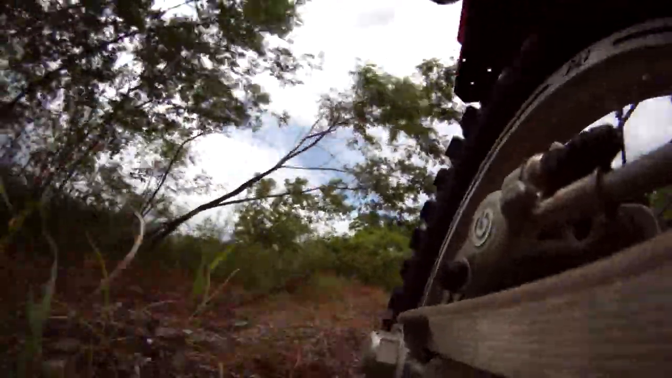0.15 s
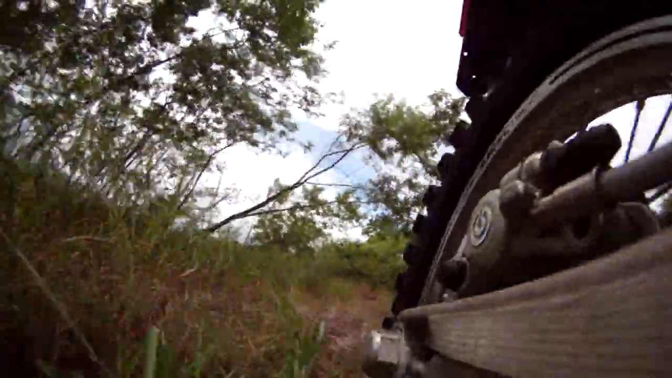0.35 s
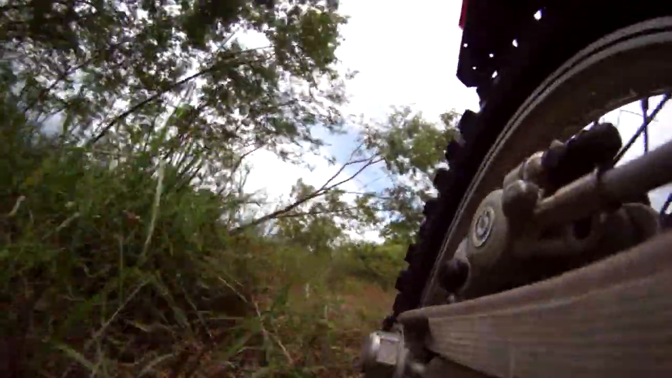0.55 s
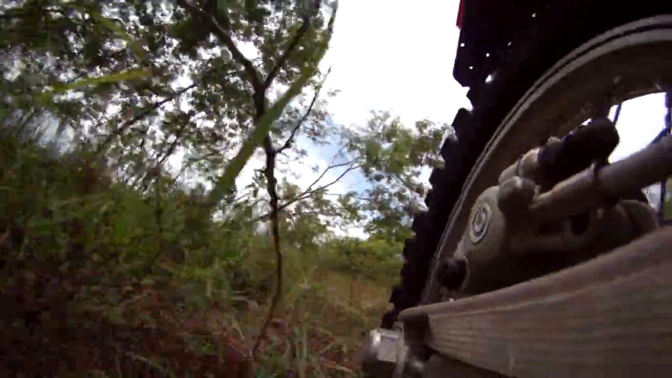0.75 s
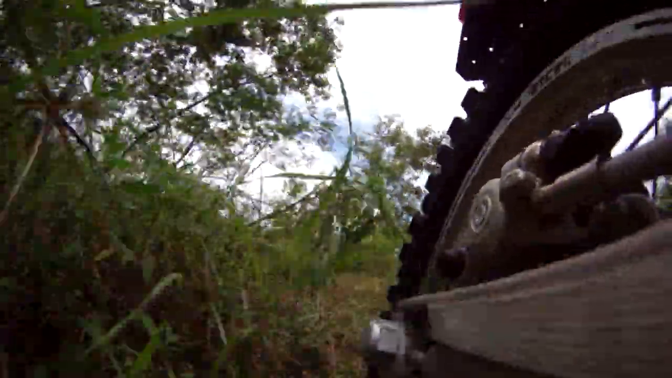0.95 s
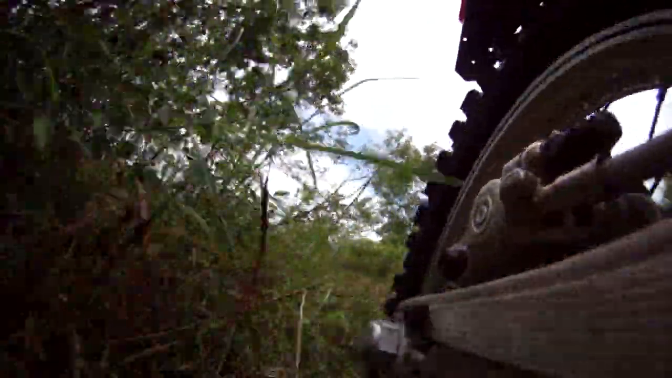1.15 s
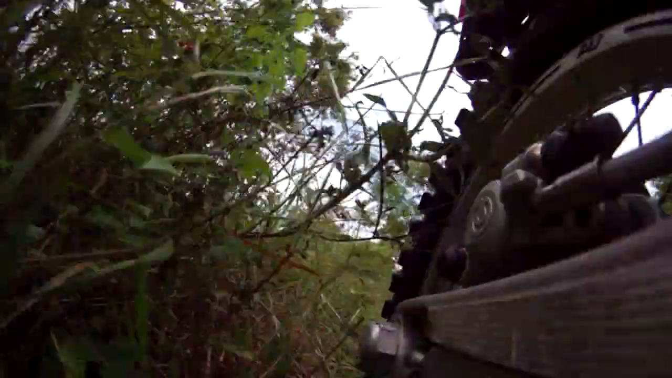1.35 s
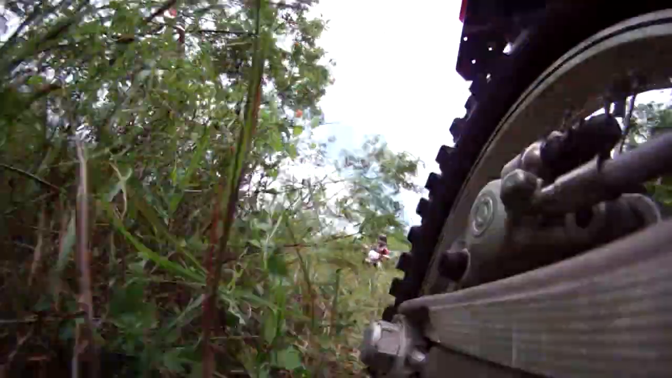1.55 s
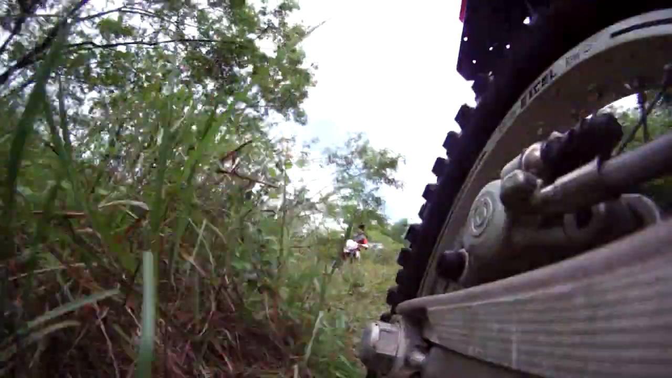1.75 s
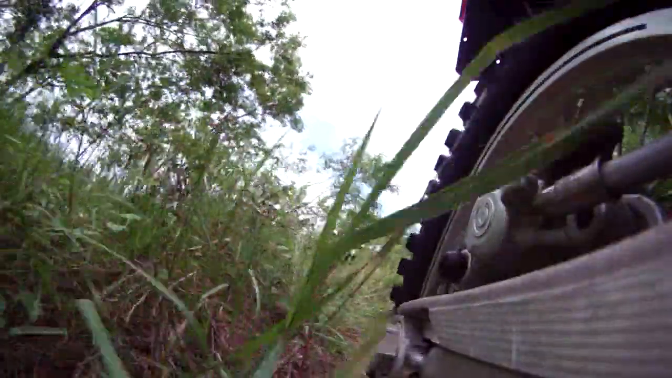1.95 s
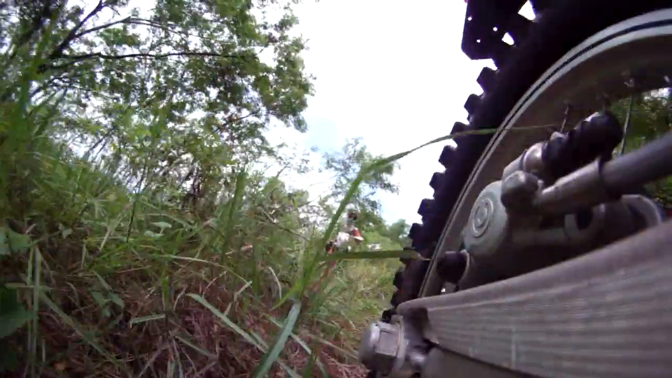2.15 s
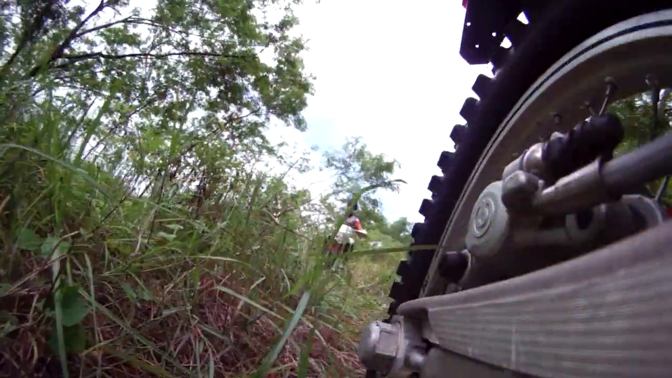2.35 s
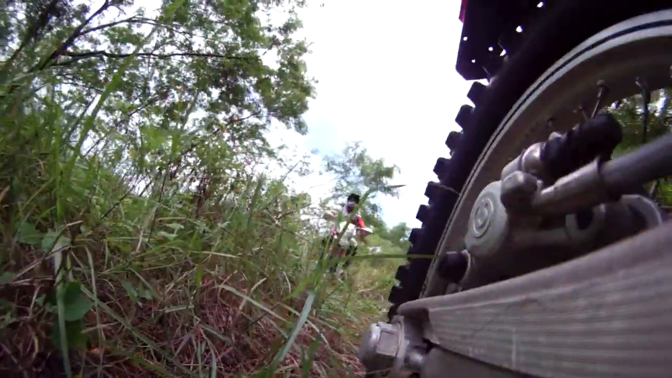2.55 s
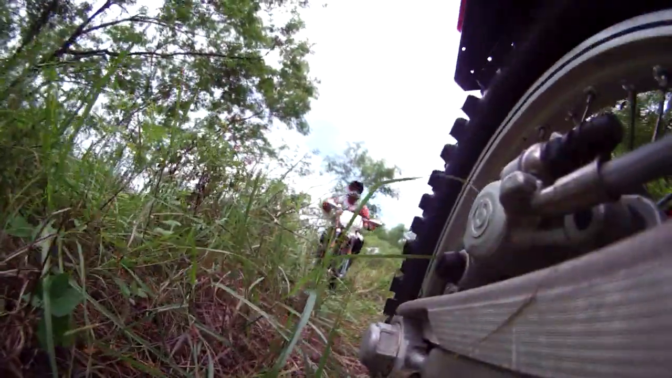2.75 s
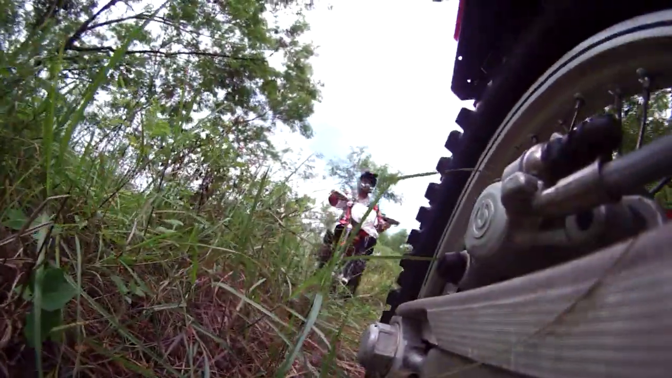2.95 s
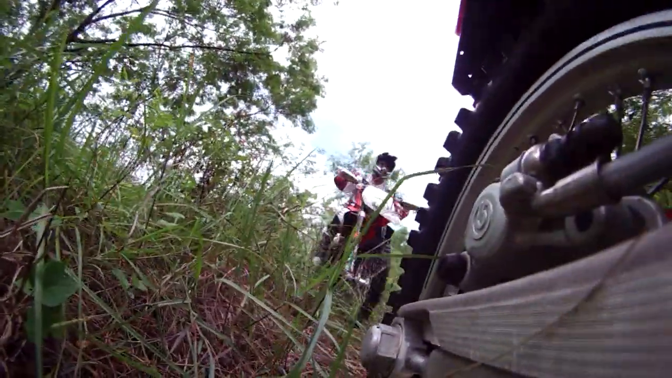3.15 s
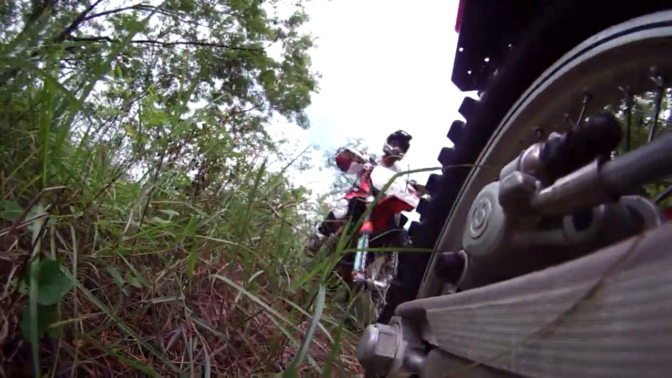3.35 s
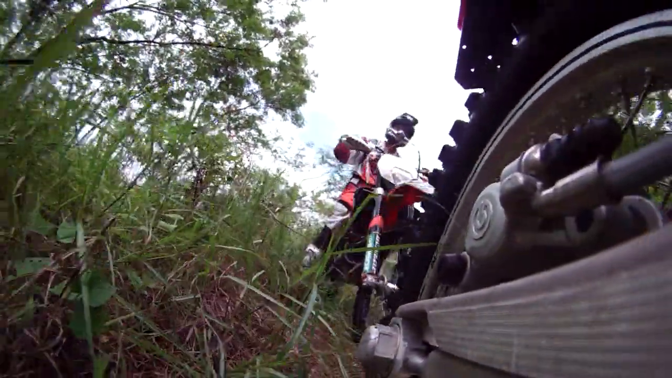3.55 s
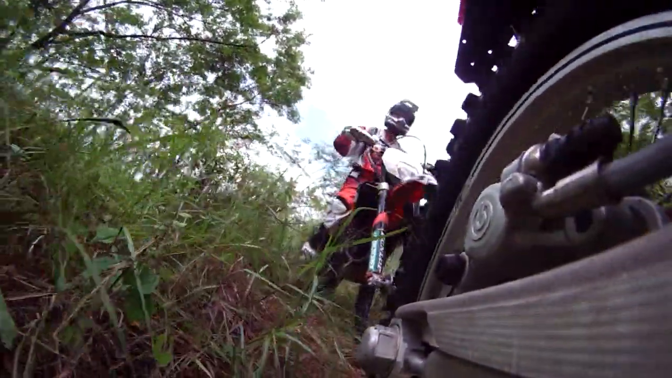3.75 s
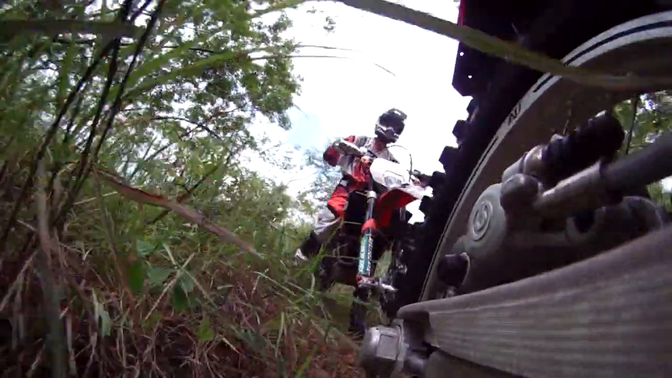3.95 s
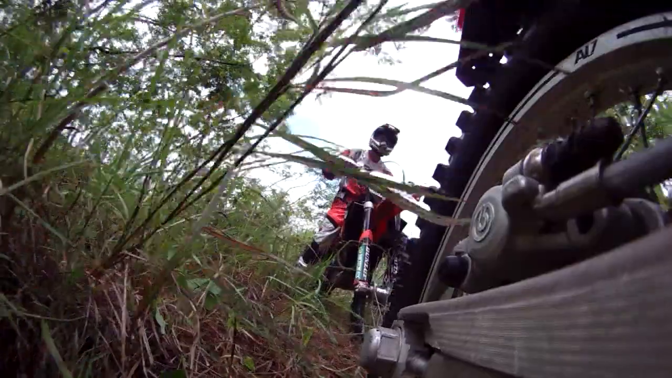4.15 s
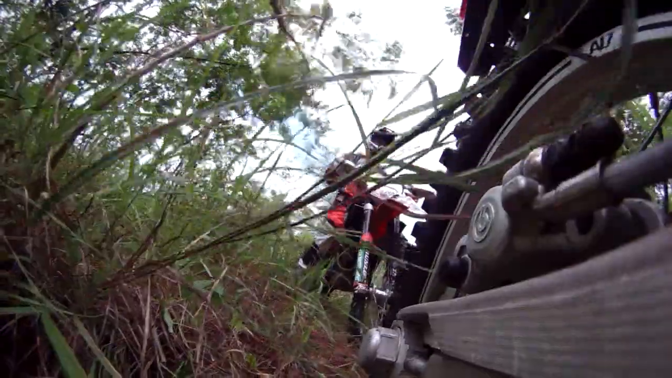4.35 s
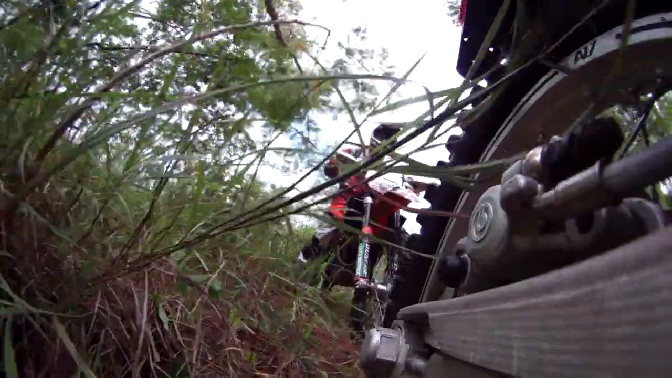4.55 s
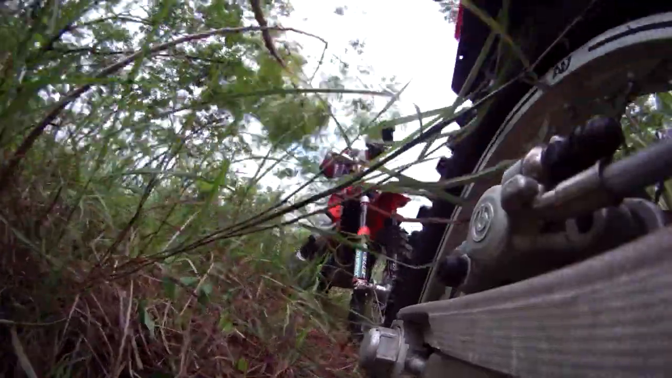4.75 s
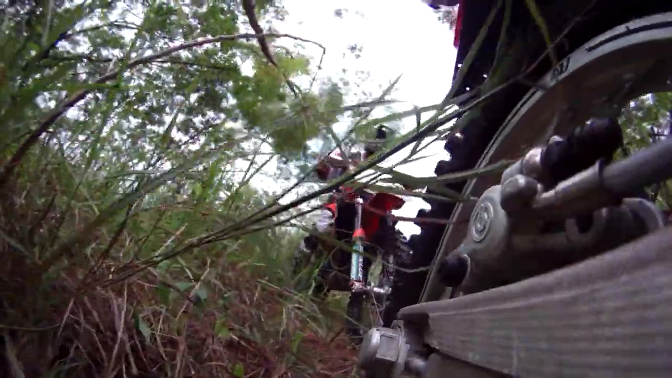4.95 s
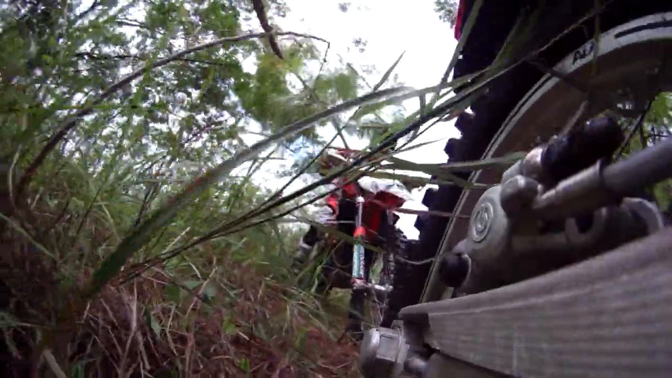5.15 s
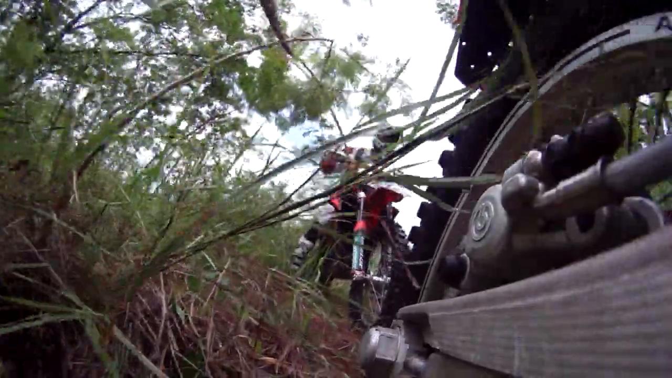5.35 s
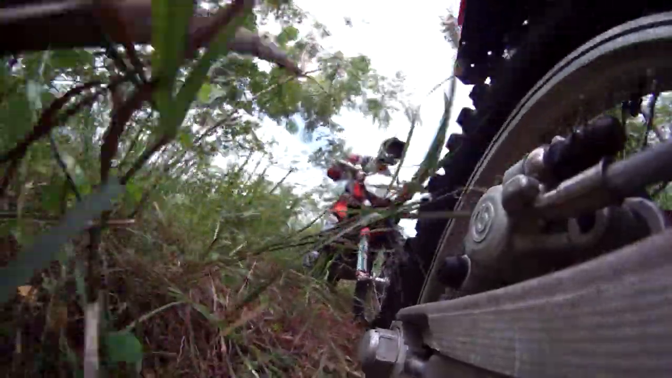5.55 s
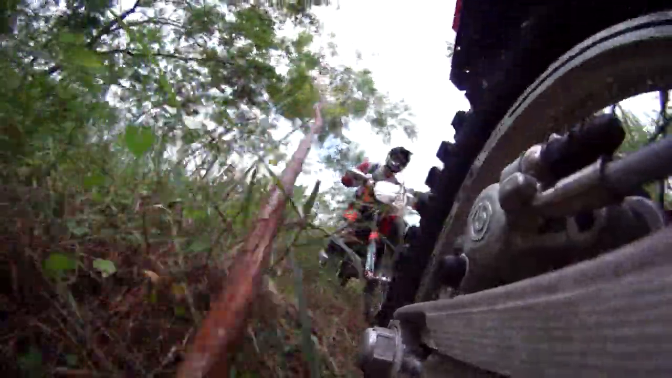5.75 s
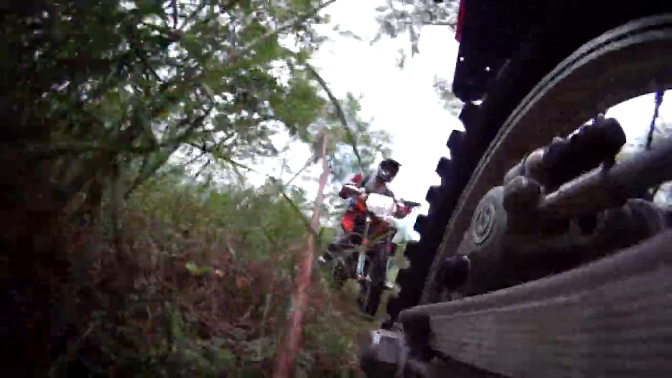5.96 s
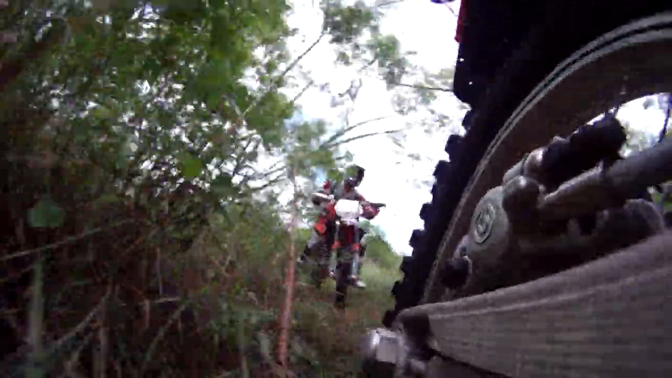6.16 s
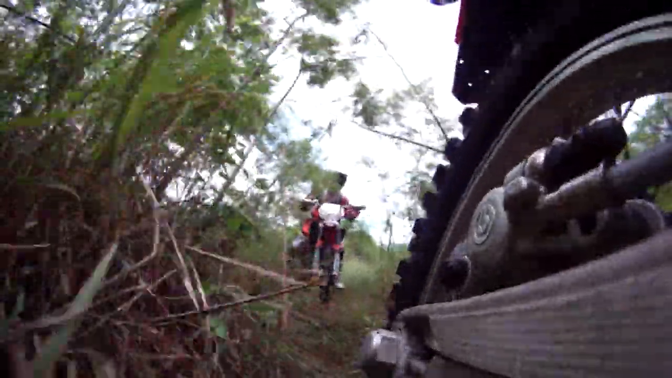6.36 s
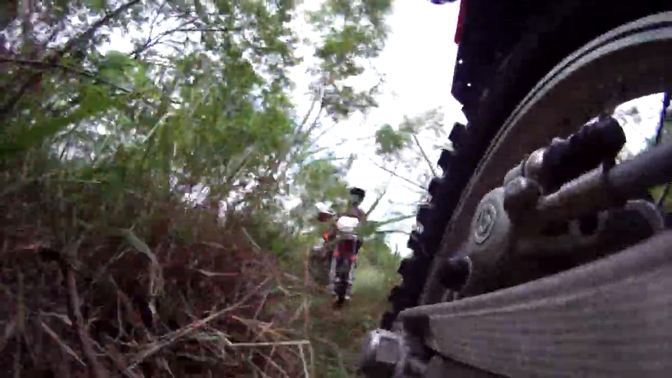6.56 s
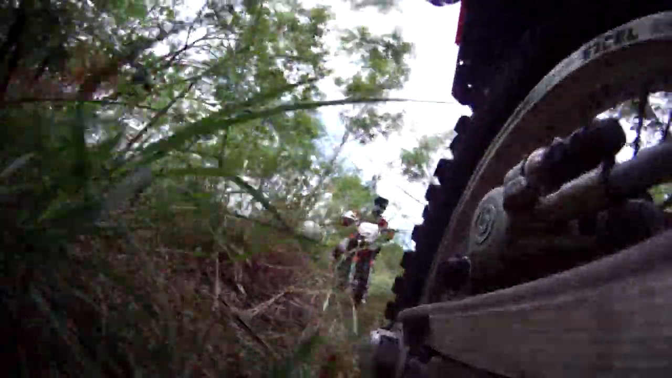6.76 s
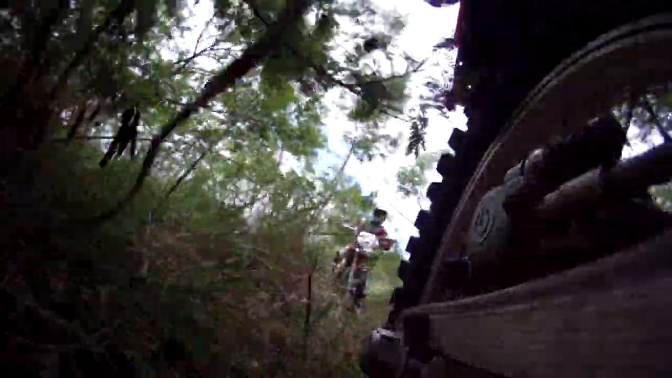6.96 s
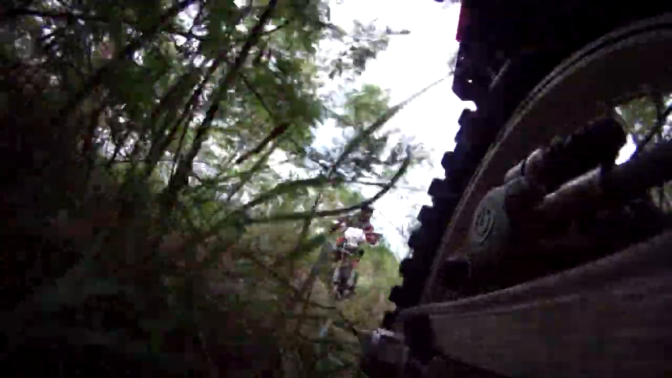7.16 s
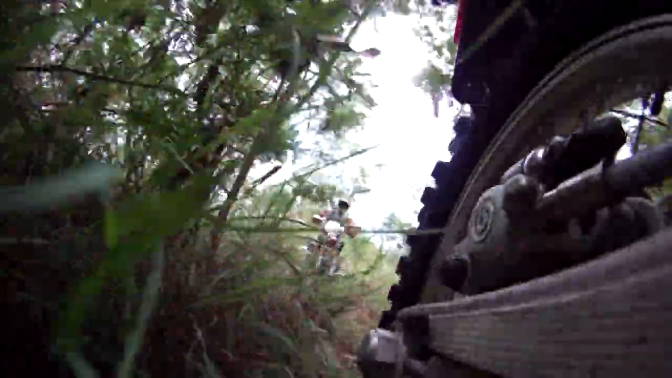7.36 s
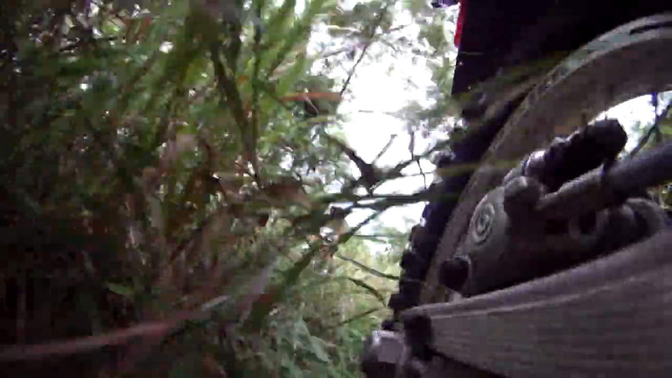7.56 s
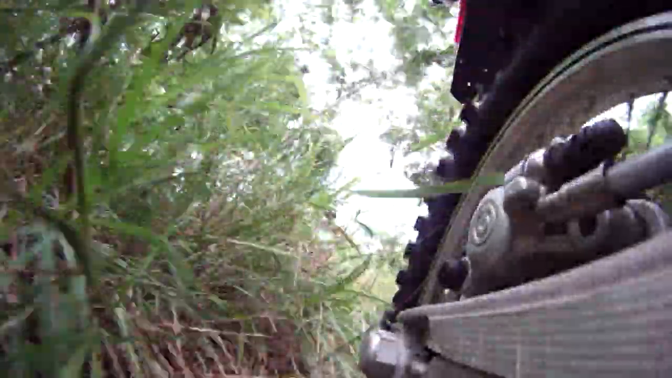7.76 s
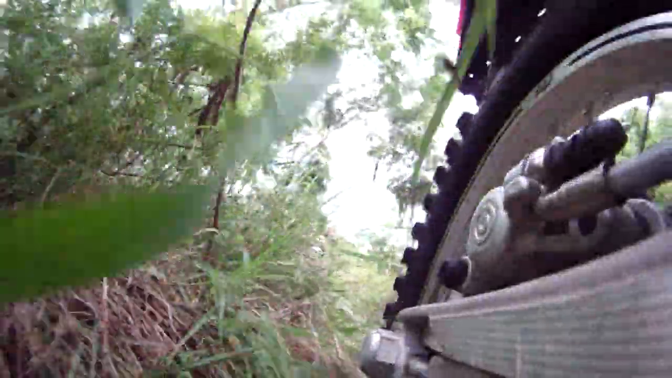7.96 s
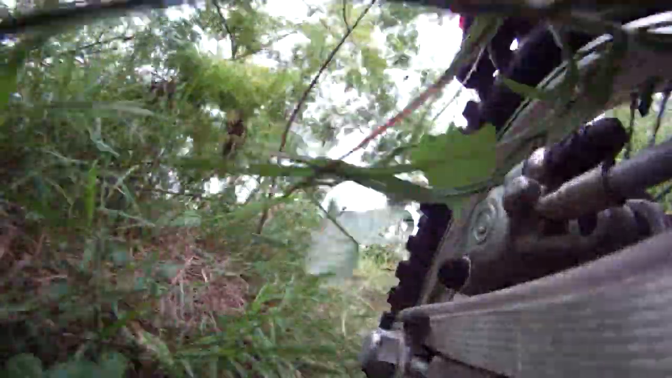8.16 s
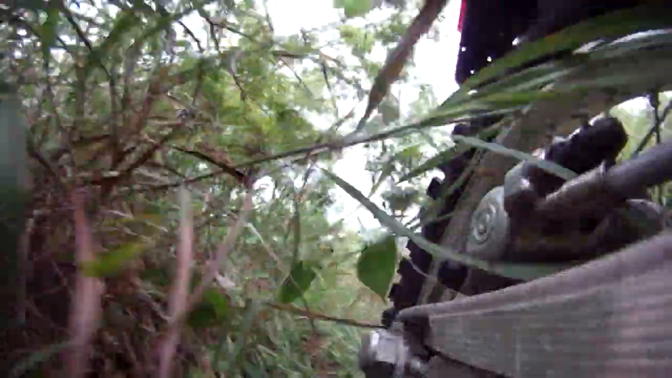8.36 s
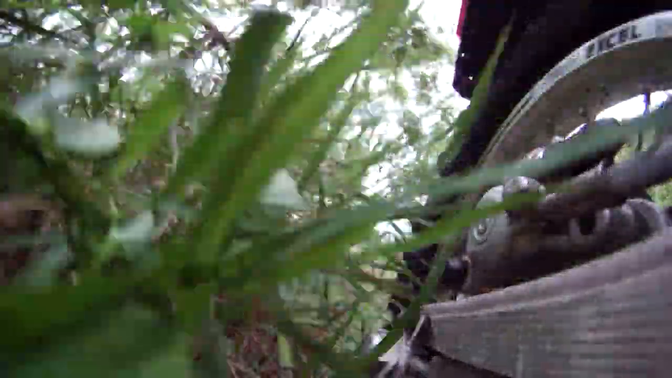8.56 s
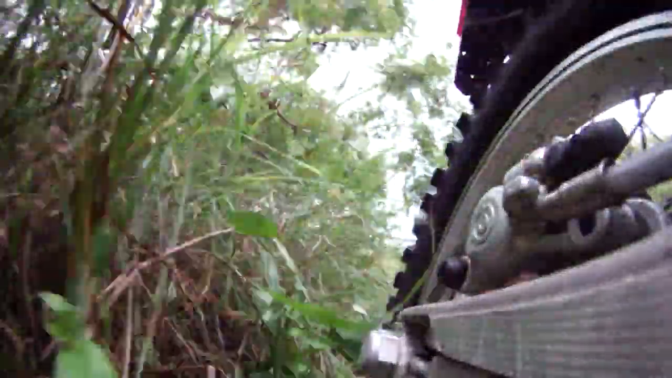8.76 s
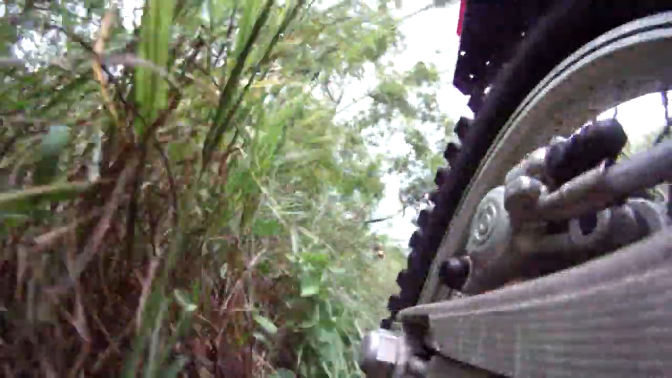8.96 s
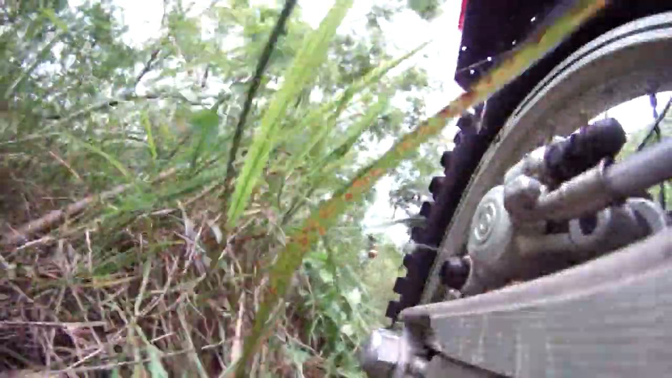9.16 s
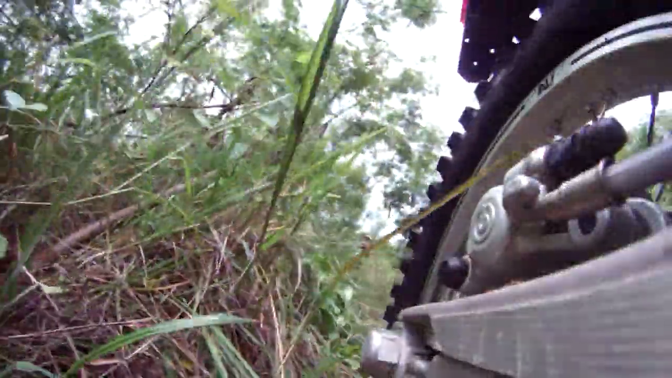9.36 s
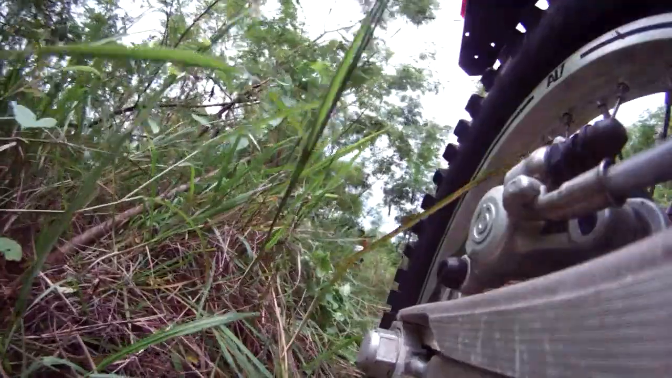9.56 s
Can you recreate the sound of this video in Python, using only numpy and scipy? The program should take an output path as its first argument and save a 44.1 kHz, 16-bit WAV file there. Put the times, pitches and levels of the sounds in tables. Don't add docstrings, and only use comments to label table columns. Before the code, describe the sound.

Close, dry, mono sound through a sealed housing bolted to a trail bike's swing arm: muffled low throb, metallic rattle, little open air. At 0 s the four-stroke single falls from a blip to a lumpy idle by 0.6 s, with deep branch thumps. At 0.75-0.95 a big branch bangs the arm, clipping harshly amid splintering cracks; more dry snaps come at 1.1-1.4, then grass ticks to 2 s. Idle chugs until a stem knock at 2.9. Throttle snaps at 3.3 and higher at 3.75, knocking hard, fall back by 4.7. From 4.95 it pulls away, fastest at 5.25-5.9, then slows by 6.6. Stems crack from 6.25; further blips at 7.2-7.6 mix with whipping twigs and dragging leaves until 8.6. Revs sink to idle by 8.2. Stem knocks hit near 9.15 while a following bike's dull exhaust tone swells, drops in pitch and vanishes by 9.6.

```python
import sys
import numpy as np
from scipy import signal
from scipy.fft import irfft
from scipy.io import wavfile
from scipy.ndimage import uniform_filter1d

SR = 44100
rng = np.random.default_rng(int(sys.argv[2]) if len(sys.argv) > 2 else 0)


def invert_db(level):
    return 10 ** (np.asarray(level, dtype=float) / 20)


def master(y):
    cut = np.clip(np.atleast_2d(y).T, -1, 1)
    pcm = np.round(cut * 32767)
    wavfile.write(sys.argv[1], SR, pcm.astype(np.int16))


N = 424241
T = np.arange(N) / SR


def ring(x, hz, width_hz):
    return signal.lfilter(*signal.iirpeak(hz, hz / width_hz, fs=SR), x)


def steep_ring(x, hz, width_hz):
    return ring(ring(x, hz, width_hz), hz, width_hz)


def body(x, modes):
    click = np.eye(1, 4096)[0]
    shape = 0
    for k, (hz, width_hz, db) in enumerate(modes):
        shape = shape + (-1) ** k * invert_db(db) * steep_ring(click, hz, width_hz) * np.sqrt(1000 / width_hz)
    shape = shape.reshape((1,) * (x.ndim - 1) + (-1,)) / np.sqrt(np.sum(shape ** 2))
    return signal.fftconvolve(x, shape, axes=-1)[..., :x.shape[-1]]


def walk(rate):
    k = int(SR / rate)
    held = np.repeat(rng.standard_normal(N // k + 1), k)
    return 1.3 * uniform_filter1d(uniform_filter1d(held, k), k)[:N]


def fade(t, t60):
    return np.exp(-np.log(1000) * t / t60)


# (time [s], crank speed [Hz], frame shake [dB], load [dB])
IDLE_BLIPS = [
    [(0, 56.77, -14, 1), (.21, 44.18, -22, 0.5), (.56, 33.49, -24, 3.5), (1.45, 32.56, -22, 4.5),
     (1.8, 32.67, -20, 2)],
    [(3.24, 31.68, -23, 1.5), (3.325, 34.7, -20, 3), (3.335, 43.06, -20.5, 6), (3.48, 65.2, -11, 2.5),
     (3.56, 65.7, -12.5, -1.5), (3.7, 49.5, -17, 1)],
    [(3.76, 57.3, -13, 5.5), (3.86, 73.6, -15.5, -1.5), (4.07, 75.86, -10.5, 1), (4.2, 65.94, -13.5, -0.5),
     (4.28, 56.76, -24, -2), (4.36, 49.85, -12, 1), (4.44, 44.47, -14, 1), (4.48, 41.54, -23, 1.5),
     (4.74, 32.47, -26, 1)],
]
# (time [s], crank speed [Hz], frame shake [dB], load [dB])
PULL_AWAY_BLIPS = [
    [(4.94, 30.12, -33, 0.5), (4.955, 39.08, -18, 6.5), (5.07, 60, -15.5, 0.5), (5.14, 63.5, -14, 3)],
    [(5.25, 89.9, -12.5, -0.5), (5.38, 88.32, -14.5, 0), (5.49, 100.5, -12, 2.5), (5.63, 90.67, -15, 1.5),
     (5.76, 87.7, -13.5, 0.5), (5.92, 74.03, -15, 2.5)],
    [(6.03, 84.72, -11.5, -0.5), (6.13, 74.29, -12, 1.7), (6.35, 52.1, -16.5, 1.5),
     (6.62, 45.46, -14.5, 1.5)],
    [(6.91, 45.31, -14.5, 3), (7.21, 64.58, -14, 0), (7.29, 60.22, -32, 5), (7.36, 58.89, -10.5, 4),
     (7.55, 62.05, -16, 1), (7.9, 40.89, -20, 1.5), (8.2, 30, -24, 5), (8.41, 33.97, -22.5, 2),
     (9.62, 31.39, -24, 4.5)],
]


def speed():
    s, *columns = np.transpose(sum(IDLE_BLIPS + PULL_AWAY_BLIPS, []))
    return [np.interp(T, s, column) for column in columns]


FIRING_TURN = 1.36


def crank():
    turns = np.cumsum(speed()[0]) / SR
    s = np.array(THROTTLE_SNAPS)[:, 0]
    slip = np.unwrap(np.pi * (FIRING_TURN - np.interp(s, T, turns))) / np.pi
    return turns + np.interp(T, s, slip)


# (centre [Hz], width [Hz], level [dB])
FIRING_RINGS = [(402, 110, 0.5), (619, 111, 5.5), (1113, 120, -3), (1600, 320, -9)]


def firings(turns, hz):
    def blow(lag):
        return np.append(0, np.diff(np.floor(turns / 2 + lag))) * np.sqrt(2 * SR / hz)

    exhaust_db = -3 - 9 * np.log2(hz / 32)
    blows = blow(-FIRING_TURN / 2) + blow(.82) * invert_db(exhaust_db)
    scatter_db = 1.2 * rng.standard_normal(N)
    return body(blows * invert_db(scatter_db), FIRING_RINGS)


def swell(rows):
    return sum(invert_db(db) * np.exp(-((T - s) / half) ** 2) for s, half, db in rows)


# (centre [s], half length [s], level [dB])
OVERRUNS = [(3.52, 0.048, -27), (4.07, 0.12, -23.5), (6.12, .14, -23), (7.05, 0.16, -31), (7.36, 0.14, -31),
            (7.75, 0.092, -30.5)]
# (centre [s], half length [s], level
# [dB])
PULLS = [(4, 0.08, -26), (4.5, 0.08, -31.5), (3.9, 0.11, -29.5), (3.88, 0.1, -29), (5.6, 0.42, -24.5),
         (5.5, 0.23, -26), (5.46, .2, -29), (5.4, .15, -25), (5.75, .15, -27), (5.6, .15, -30),
         (4.07, 0.22, -30), (6.1, .13, -23.5), (5.3, 0.075, -34), (5.7, 0.13, -31.5), (4.6, 0.098, -29),
         (5.28, 0.18, -29), (4.3, .08, -28)]
PULL_ORDERS = [2.5, 6, 5.5, 6, 6.5, 4.5, 5.5, 3.5, 3, 2.5, 8, 8, 3, 2.5, 13, 2, 10]
# (centre [s], half length [s], level [dB])
GEAR_WHINES = [(3.55, 0.088, -25.5), (4.12, 0.1, -30), (7.32, 0.17, -30.5)]


def overrun(turns, hz):
    ring_hz, ring_width_hz, half_order_db, gear_teeth = 610, 68, 1, 24.5
    wobble, flutter_db = .4 * walk(18), 2.2 * walk(14)
    lines = pulls = 0
    for order in np.arange(5.5, 12, .5):
        near = np.exp(-((order * hz - ring_hz) / ring_width_hz) ** 2)
        level_db = half_order_db * (order % 1 > 0) + np.roll(flutter_db, int(order * SR))
        lines = lines + near * invert_db(level_db) * np.cos(2 * np.pi * order * turns + order ** 2 + wobble)
    for row, order in zip(PULLS, PULL_ORDERS):
        level = swell([row]) * invert_db(np.roll(flutter_db, int(order * SR)) / 2)
        pulls = pulls + level * np.cos(2 * np.pi * order * turns + 1.8 * order)
    throb = (1 + .6 * np.cos(2 * np.pi * turns)) * invert_db(3.4 * walk(120))
    whine = throb * np.cos(2 * np.pi * gear_teeth * turns + .7 * walk(150))
    return np.sqrt(2) * (swell(OVERRUNS) * lines + pulls + swell(GEAR_WHINES) * whine)


def rattle(turns, modes, repeat, lag, decay, bed, scatter_db):
    cycle = turns + lag
    turn_db = 2 * (np.arange(2000) % 2 - 2.0)
    strength = invert_db(scatter_db * rng.standard_normal(2000) + turn_db)[cycle.astype(int) % 2000]
    gate = bed + strength * np.exp(-(cycle % 1) / decay)
    steps = 256 * turns
    even = irfft(np.exp(2j * np.pi * rng.random(257))) * np.sqrt(512)
    pattern = np.interp(steps % 512, np.arange(512), even) * np.sqrt(np.gradient(steps))
    loose = np.sqrt(1 - repeat) * rng.standard_normal(N) * invert_db(1.7 * walk(300))
    chatter = (loose + np.sqrt(repeat) * pattern) * gate
    return body(chatter / np.sqrt(np.mean(gate ** 2)), modes)


# (multiple of crank speed, level at idle [dB], gain per octave of speed [dB])
WEAK_ORDERS = [(.5, -47.5, 7), (1.5, -37.5, 4.5), (2.5, -34, 0.5), (3, -33.5, -7), (3.5, -44.5, 6),
               (4, -35, -5.5), (4.5, -36.5, -3)]
# (crank speed [Hz], level [dB])
SECOND_ORDER = [(31, -29.5), (45, -30), (58, -28.5), (74, -28), (88, -23), (100, -19)]
# (centre [Hz], width [Hz], level [dB])
FRAME_RINGS = [(160, 63, 1), (269, 110, -5), (434, 156, 0.5), (625.4, 196, 5), (892, 380, -4.5),
               (1096, 104, 0)]
# (centre [Hz], width [Hz], level [dB])
SHELL_RINGS = [(1433, 412, 6.36), (1735, 397, 2.76), (1999, 520, 1)]
# (centre [Hz], width [Hz], level [dB])
TOP_RINGS = [(3026, 740, 17.5), (3400, 980, -4), (4660, 910, 14.5), (5840, 6000, -18), (9000, 1300, -31)]


def engine():
    hz, first_db, load_db = speed()
    turns = crank() + .015 * walk(20)
    octaves = np.log2(hz / 32)
    climb = uniform_filter1d(np.gradient(octaves) * SR, size=4000)
    throttle_db = 3 * np.tanh(climb / 0.97)
    clutch_db = 5.5 * (T > 1.3) * (T < 2.62)
    second_db = np.interp(hz, *np.transpose(SECOND_ORDER)) + 0.29 * load_db + clutch_db
    boom = np.exp(-((hz - 77) / 2) ** 2)
    frame_db = -27.5 + 4 * octaves + 0.47 * load_db + 1 * boom
    shell_db = -35 + 8 * octaves + load_db
    firing_db = -36.5 + 3.5 * octaves + 0.22 * load_db + throttle_db - 1 * boom
    intake_db = -67.5 + 12 * octaves + load_db + 1.5 * walk(25)

    shake = invert_db(first_db + 1.1 * walk(29)) * np.cos(2 * np.pi * turns)
    shake -= invert_db(second_db + 1.8 * walk(14)) * np.cos(4 * np.pi * turns + .5)
    for order, db, rise_db in WEAK_ORDERS:
        level_db = db + rise_db * octaves + (order > 2) * throttle_db + 3.13 * walk(7)
        shake += invert_db(level_db) * np.cos(2 * np.pi * order * turns + order ** 2 + 0.28 * walk(8))

    locked = np.clip(.3 + .35 * octaves, .2, .75)
    frame = rattle(turns, FRAME_RINGS, locked, lag=.7, decay=.32, bed=.34, scatter_db=1.2)
    shell = rattle(turns, SHELL_RINGS, locked / 2, lag=.66, decay=.3, bed=.5, scatter_db=1.2)
    top = rattle(turns, TOP_RINGS, 0 * locked, lag=0.48, decay=0.82, bed=0.86, scatter_db=4.0)
    intake = steep_ring(rng.standard_normal(N), 7300, 1700) * (1 + .4 * np.cos(2 * np.pi * turns))
    out = np.sqrt(2) * shake + overrun(turns, hz) + invert_db(firing_db) * firings(turns, hz)
    out += invert_db(frame_db + 2.5) * frame + invert_db(shell_db + 1.5) * shell
    return out + invert_db(intake_db) * intake + invert_db(shell_db - 11.5) * top


# (time [s], level [dB])
JOLTS = [(0, -25), (.45, -21.5), (1, -31.5), (3.3, -28), (3.6, -19), (4.6, -31), (4.9, -28), (5.6, -25),
         (5.9, -23), (6.15, -27.5), (7.3, -22.5), (8, -22.5), (8.3, -36), (9.62, -21.5)]


def jolts():
    rumble = body(rng.standard_normal(N), [(30, 29, 0.0015), (75.2, 66, 0.02)])
    return invert_db(np.interp(T, *np.transpose(JOLTS)) + 3.4 * walk(8)) * rumble


# (time [s], peak level [dB], pitch [Hz], t60 [s])
THUMPS = [(0.03, -1.5, 66, 0.089), (0.148, -4.5, 64, 0.11), (0.344, -6, 51.84, .11),
          (0.54, -24.5, 110.3, 0.039), (2.917, -8.5, 160, 0.031), (9.165, -11, 209, 0.069)]
# (time [s], peak level [dB], pitch [Hz], t60 [s])
BANGS = [(.765, -4, 130, .05), (.7925, 4, 38, .15), (.8225, 0, -75, .05), (.8285, 6, 31, .05),
         (.851, 4, 90, .025), (.8565, 4, -62, .09)]
# (start [s], length [s], peak level [dB], upper rings against it [dB])
DRAGS = [(0.757, 0.083, -13.5, -5), (1.161, 0.085, -28, -11), (2.904, 0.035, -26, -13),
         (5.586, 0.043, -39.5, 5), (6.97, 0.051, -33.5, -2), (7.402, 0.21, -29, -4),
         (7.695, 0.13, -26.5, -3.5), (8.188, 0.088, -45, 6), (8.291, 0.16, -39, -2),
         (8.46, 0.085, -24.5, -2.5), (8.559, .045, -24.5, -3.5), (9.6, .04, -42, 0.5),
         (8.94, 0.057, -46, 0)]
# (centre [Hz], width [Hz], level [dB])
DRAG_RINGS = [(1170, 980, 4), (1696, 330, 10), (2550, 430, 5), (3200, 1050, -1.5), (5000, 1500, -14),
              (7750, 1500, -25)]


def branches():
    out = np.zeros(N)
    for s, db, hz, t60 in THUMPS + BANGS:
        t = np.clip(T - s, 0, None)
        out -= invert_db(db) * np.sin(2 * np.pi * hz * t) * fade(t, t60)
    slips = rng.standard_normal(N) * invert_db(3.5 * walk(400))
    low, high = body(slips, DRAG_RINGS[:4]), body(slips, DRAG_RINGS[3:])
    edge_db = -1.5
    for s, length, db, upper_db in DRAGS:
        share = (T - s) / length
        shape_db = np.interp(share, [0, .06, .25, .85, 1], [-24, edge_db, 0, edge_db / 2, -24])
        out += invert_db(db + shape_db) * (T > s) * (T < s + length) * (low + invert_db(upper_db) * high)
    return out


# (time [s], peak level [dB])
GRASS_TICKS = [(0.125, -19), (0.196, -19), (1.044, -19), (1.1, -18), (1.264, -16), (1.259, -23),
               (1.286, -19), (1.3114, -20), (1.399, -12), (1.4286, -19), (1.4575, -15), (1.503, -17),
               (1.526, -18), (1.764, -23), (1.8587, -18.5), (2.043, -20.5), (6.596, -20.5), (6.8064, -21),
               (6.8886, -18.5), (6.901, -16), (7.0706, -23), (7.655, -15.5), (7.7258, -23), (7.7748, -15.5),
               (7.885, -17.5), (8.468, -13), (8.486, -15), (8.513, -15), (8.527, -25), (8.546, -23),
               (8.561, -18), (9.0933, -20), (9.215, -18), (9.409, -22), (9.437, -19.5)]
# (time [s], peak level [dB])
BLADE_FLICKS = [(0.4414, -20), (0.943, -14), (0.9593, -34.5), (1.0106, -25), (1.3008, -16), (6.786, -19.5),
                (6.993, -19), (7.2525, -17), (7.296, -13), (7.424, -16), (7.7994, -27), (7.9556, -19),
                (7.998, -21), (8.0564, -42), (8.1504, -34), (8.201, -28), (8.22, -18.5), (8.3115, -23),
                (8.3668, -19), (8.4138, -21), (8.76, -35), (8.9535, -30), (9.0447, -41), (9.2856, -24),
                (9.3576, -22), (9.3823, -27), (9.4644, -33)]
# (start [s], end [s])
ROLLING_SPELLS = [
    (.3, 2.2),
    (6.4, 9.6),
]


def grass():
    rows = [(s, db - 0.6, -2.5, -8, -28, .015) for s, db in GRASS_TICKS]
    rows += [(s, db - 8.0, 1.5, -1.5, -18, .02) for s, db in BLADE_FLICKS]
    ticks_per_s = 5.9
    for start, end in ROLLING_SPELLS:
        for when, size, tone in rng.random((int(ticks_per_s * (end - start)), 3)):
            s = start + when * (end - start)
            rows.append((s, -45 + 1 * size, 6.0 - 8.5 * tone, 7.7 * tone - 8.0, -19, .06))
    return rows


# (first firing [s], length [s], peak level [dB])
THROTTLE_SNAPS = [(3.34, .16, -5), (3.727, .08, -11), (4.964, .1, -10), (5.149, .09, -13.5),
                  (5.387, .095, -4)]


def knocks():
    cycles, rows = crank() / 2, []
    for s, length, db in THROTTLE_SNAPS:
        first, last = np.interp([s, s + length], T, cycles)
        times = np.interp(np.arange(first, last), cycles, T)
        for t in times:
            soft = t == times[0]
            rows.append((t, db - 5.5 * soft, -30, -34, -27 - 12.0 * soft, .017))
    return rows


# (time [s], shell peak [dB], 3 kHz ring [dB], 4.6 kHz ring [dB]), rings against shell
DRY_BRANCHES = [(.753, 5.5, -6, -19), (0.7603, -0.5, -1, -19), (0.7625, 2, 5, -11), (0.7652, 5.5, -1, -14),
                (.783, 9, -5, -24), (.789, -4, -5, -16), (0.7957, -3, -4, -17), (0.799, 9.5, -8, -13),
                (0.8037, -3, -1.5, -11), (0.8107, -3, 1, -10), (0.817, -6, -4, -9), (.851, -12.5, -4.5, -9),
                (.894, -19, 0, -2), (0.918, -4.5, -7, -9.5), (1.125, -6.5, -5, -13),
                (1.132, -4.5, -1.5, -4), (1.198, -3.5, -3, -8), (1.2054, -2, -2, -9),
                (1.2105, 2.5, -5.5, -20), (1.2165, -5, -5, -12), (1.2357, 3.5, -6.5, -30),
                (1.3517, -6, -4.5, -2), (1.3654, -2.5, 0, -17)]
# (time [s], shell peak [dB], 3 kHz ring [dB], 4.6 kHz ring [dB]), rings against shell
GREEN_STEMS = [(2.9159, -15, -6, -4), (5.5873, -8.5, -17, -12), (6.2504, -2.5, -6, -4.5),
               (6.318, -5.5, -7.5, -23), (6.344, -6.5, -9, -19), (6.7142, -7.5, -15, -12),
               (7.159, -17, -19, -3), (7.4967, -3.5, -4.5, -12), (7.537, -11, 4, -1), (7.549, -8, -14, -18),
               (7.5725, -6, -23, -21), (7.5797, -7, -23, -22), (7.599, -10.5, -17, -22),
               (7.7016, -8, -15, -10), (7.7213, -3, -1, -12), (7.7442, -10, -8, -18),
               (7.8489, -11.5, -1.5, -5), (8.157, -30, -18, -19), (8.4489, -4, -33, -1),
               (8.474, -2.5, -6, -8.5), (8.5084, -6, -11, -12), (8.569, -2.5, -11, -18),
               (8.579, -6, -9, -12), (8.587, -4, -8, 1.5), (9.1335, -4, -11.5, -16.5),
               (9.165, 0, -12, -15.5), (9.191, -0.5, -16, -23)]
# (centre [Hz], width [Hz], level [dB])
WALL_RINGS = [(1427, 400, 1), (1745, 336, 4), (2134, 620, -7.5)]
# (centre [Hz], width [Hz], level [dB])
KNOCK_RINGS = [(1425, 340, 0.5), (1890, 710, -6)]


def twigs():
    rows = [(*row, -15, 0.017) for row in DRY_BRANCHES]
    for s, db, mid_db, upper_db in GREEN_STEMS:
        t60 = 0.028 * invert_db(-0.66 * (upper_db + 14.5))
        rows.append((s, db, mid_db, upper_db, -17 + 1.5 * upper_db, t60))
    return rows


def whips():
    out, t = np.zeros(N + 2048), T[:2048]
    knock_rows = knocks()
    hard = len(knock_rows)
    rows = np.array(knock_rows + twigs() + grass())
    s, db, mid_db, upper_db, treble_db, t60 = rows.T[:, :, None]
    noise = rng.standard_normal((len(s), len(t)))
    fall = fade(t, np.maximum(t60, .006))
    noise[:hard] = .4 * noise[:hard] + .9 * np.abs(noise[0]) * (t < .0003) * 4.0
    noise[hard:, :6] *= 3.0
    crack = noise * fall ** 1.7
    shell = np.vstack([body(crack[:hard], KNOCK_RINGS), body(crack[hard:], WALL_RINGS)])
    mid = body(noise * fall ** 0.95, [(2485, 600, -1), (3210, 640, -0.95)])
    upper = body(noise * fall ** 1.4, [(4420, 1670, 0)])
    treble = body(noise * fall ** 5.5, [(7650, 11000, 0)])
    frame = body(noise * fall ** 1.1, FRAME_RINGS)
    frame_db = -11.0 - np.clip(db + 2, 0, None)
    parts = [(shell, 1.5), (mid, mid_db + 2.5), (upper, upper_db + 1.5), (treble, treble_db - 5.0),
             (frame, frame_db)]
    cracks = 0
    for part, part_db in parts:
        cracks = cracks + invert_db(db + part_db) * part / np.abs(part).max(axis=1, keepdims=True)
    for start, sound in zip(s[:, 0], cracks):
        out[int(start * SR):][:len(t)] += sound
    return out[:N]


# (time [s], t60 [s], peak level [dB], centre [Hz], width [Hz])
RASPS = [(0.799, 0.055, 1, 1160, 350), (.911, 0.042, -17, 800, 400), (0.939, 0.037, -12.5, 1000, 400),
         (1.235, 0.064, -4.5, 980, 500), (1.125, 0.0076, -1.5, 3444, 600), (1.132, 0.051, -5, 3400, 500),
         (1.126, 0.0062, -21, 8600, 3000), (1.132, 0.009, -11, 8600, 3000), (1.158, 0.044, -10, 1800, 500),
         (1.158, .04, -17, 3400, 900), (1.168, .04, -12, 1740, 350), (8.479, .02, -24, 7400, 2500),
         (8.156, .025, -15, 1500, 600), (1.389, .03, -23, 1700, 500), (6.251, .006, -20, 12000, 4000),
         (8.588, .006, -10, 4400, 900), (1.168, .03, -14, 3280, 500), (1.18, 0.059, -12, 3400, 450),
         (1.226, .025, -8, 3020, 700), (1.31, 0.029, -18, 3570, 500), (6.251, 0.0048, -27, 9700, 5000),
         (6.249, 0.012, -13, 4150, 1200), (6.715, 0.013, -17.5, 4340, 900), (7.059, 0.018, -32, 7004, 2500),
         (7.721, 0.0054, -28.5, 9000, 5000), (8.587, 0.0065, -18, 9100, 5000),
         (9.135, 0.017, -16.5, 4660, 800), (9.193, .02, -15, 4670, 800), (1.235, 0.027, 0, 2480, 400),
         (7.07, 0.044, -32, 7400, 2500), (2.916, 0.065, -10, 680, 400), (2.917, 0.054, -11, 1200, 600),
         (2.917, 0.035, -21, 2680, 1500), (5.596, 0.033, -18, 4200, 920), (5.604, 0.062, -16, 4460, 1510),
         (8.474, .04, -4, 810, 400), (8.952, .06, -33, 3900, 600), (9.167, 0.09, -15, 329, 200)]


def rasps():
    out, t = np.zeros(N), T[:4096]
    for s, t60, db, hz, width_hz in RASPS:
        scrape = rng.standard_normal(len(t)) * fade(t, t60)
        burst = body(scrape, [(hz, width_hz, 0)])
        out[int(s * SR):][:len(t)] += invert_db(db) * burst / np.abs(burst).max()
    return out


# (time [s], pitch [Hz], level [dB])
FOLLOWER = [
    (9.05, 193.3, -38),
    (9.2, 181.9, -26.5),
    (9.351, 160, -22.5),
    (9.5, 138.6, -21.5),
    (9.62, 139, -49),
]


def follower():
    s, hz, db = np.transpose(FOLLOWER)
    level_db = np.interp(T, s, db, left=-150) + 3.5 * walk(40)
    return invert_db(level_db) * np.sin(2 * np.pi * np.cumsum(np.interp(T, s, hz)) / SR)


def scene():
    return (engine() + jolts() + branches() + whips() + rasps() + follower())[None]


def roll_off(x):
    return signal.sosfilt(signal.butter(12, 16150, fs=SR, output="sos"), x)


def record(dry):
    hiss = invert_db(-73.5) * rng.standard_normal(N)
    clipped = np.clip(dry + hiss, -1.01, 1.01)
    top = signal.ellip(6, .5, 36, 14200, fs=SR, output="sos")
    return roll_off(signal.sosfilt(top, clipped))


dry = scene()
out = record(dry)
master(out)
```